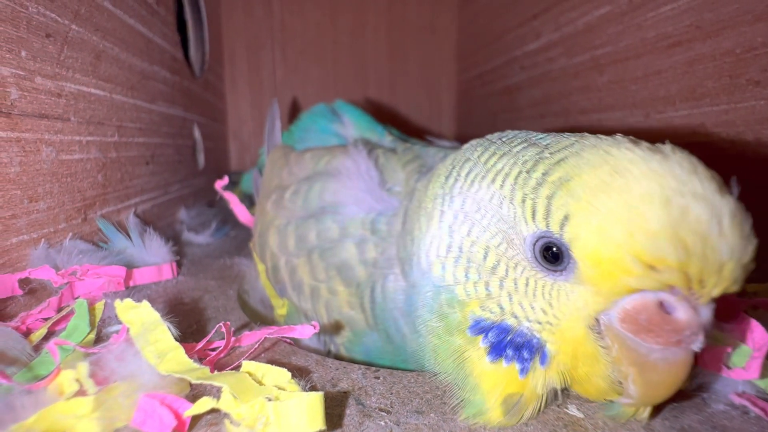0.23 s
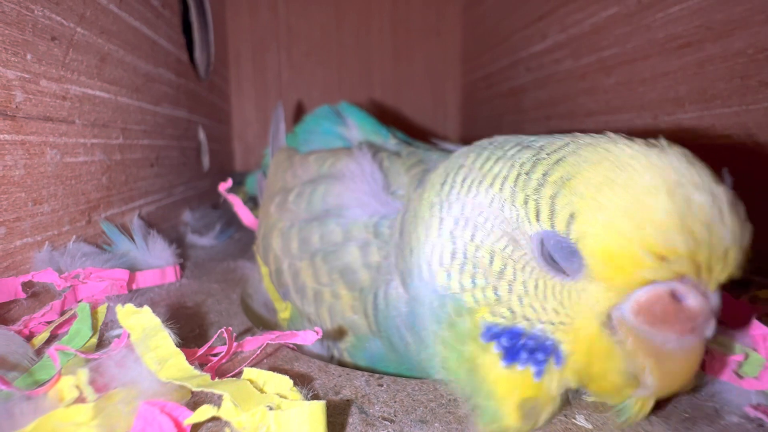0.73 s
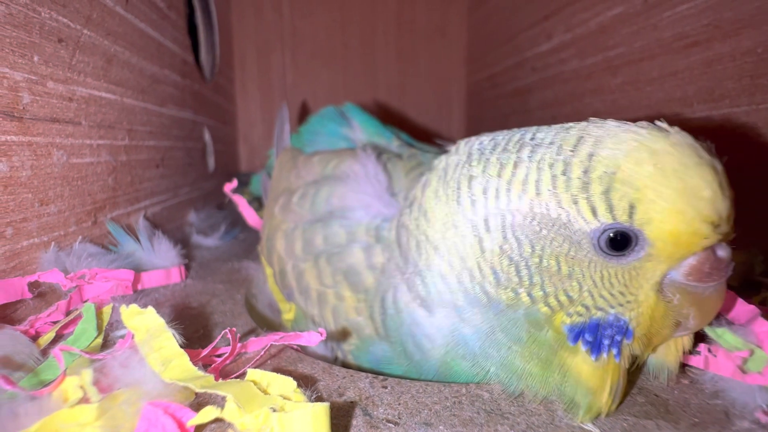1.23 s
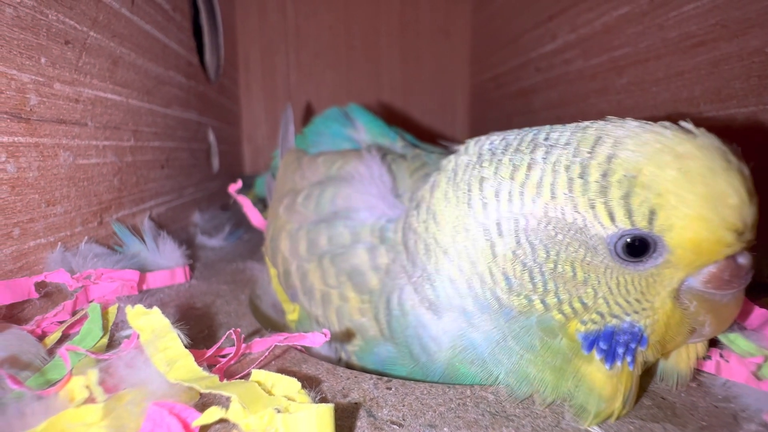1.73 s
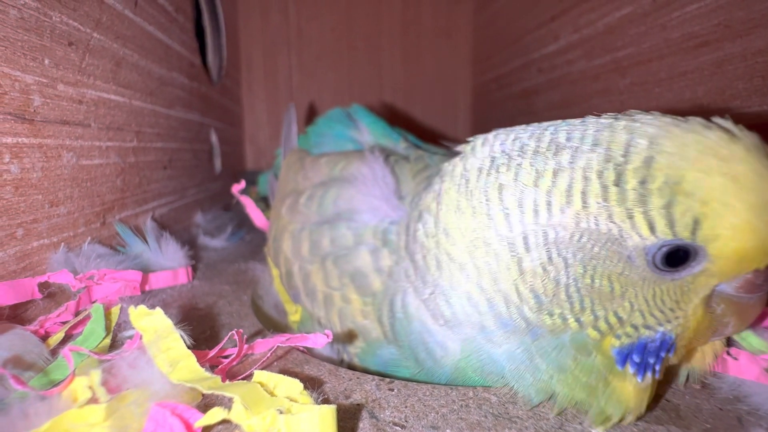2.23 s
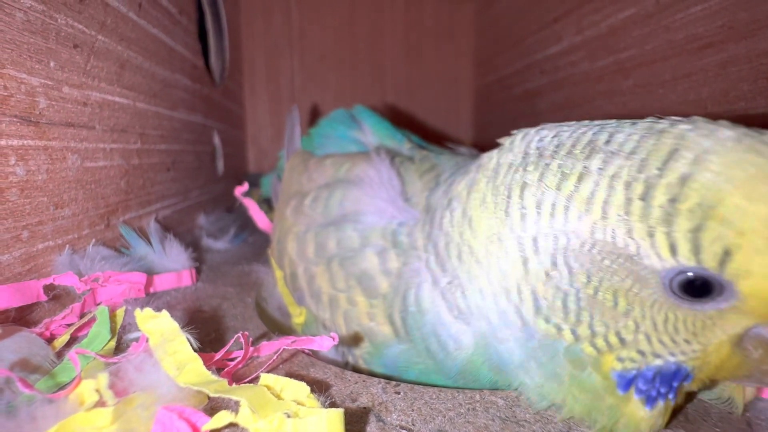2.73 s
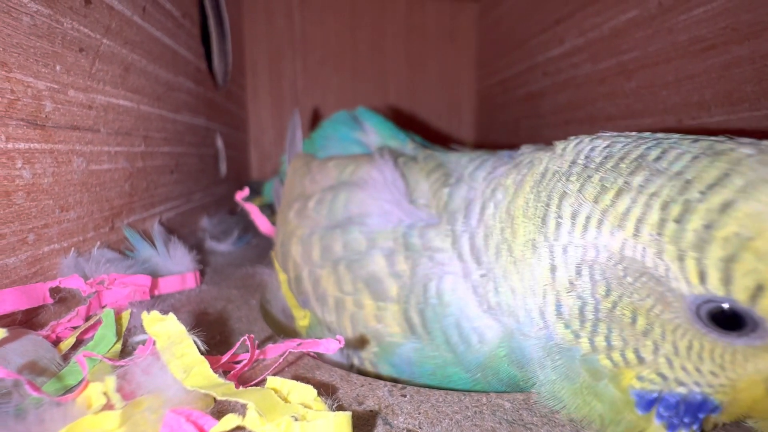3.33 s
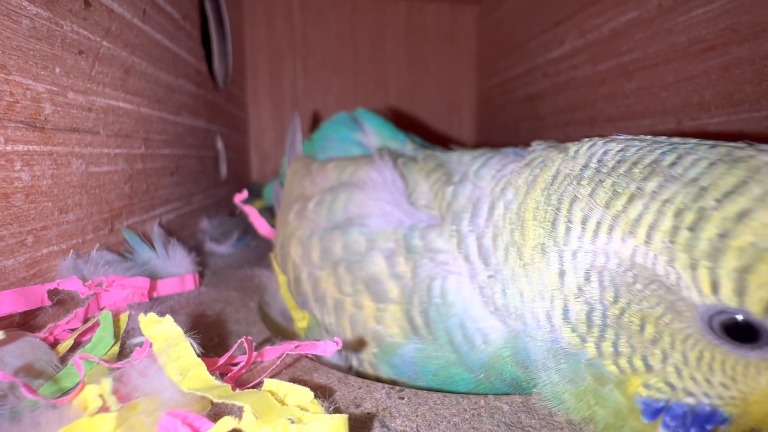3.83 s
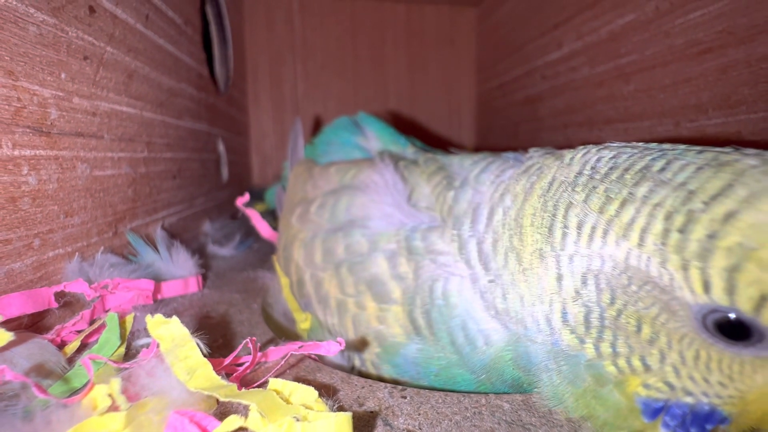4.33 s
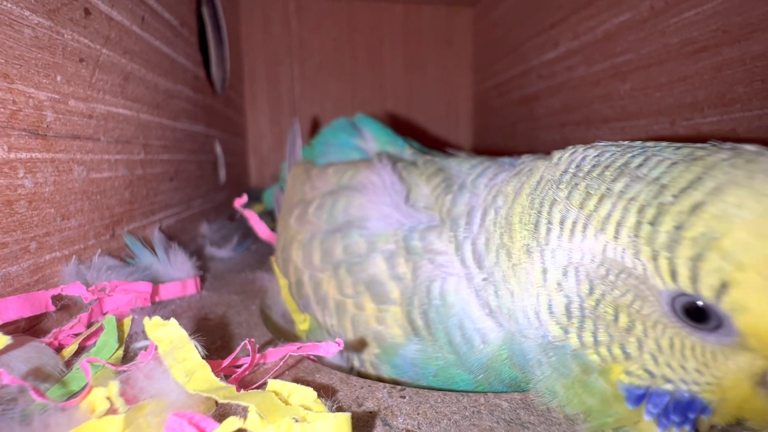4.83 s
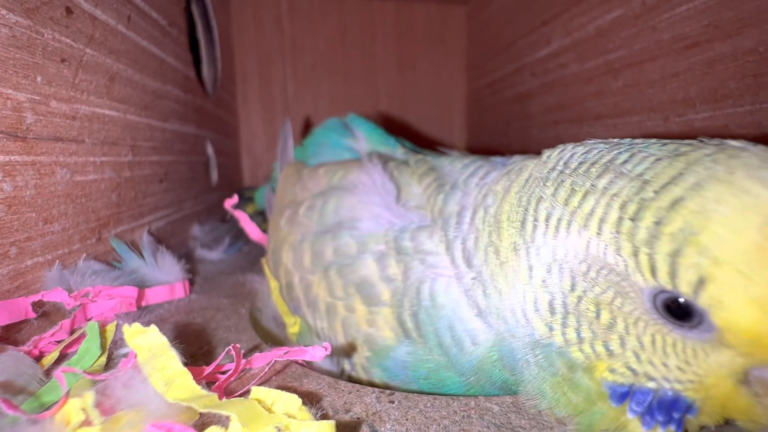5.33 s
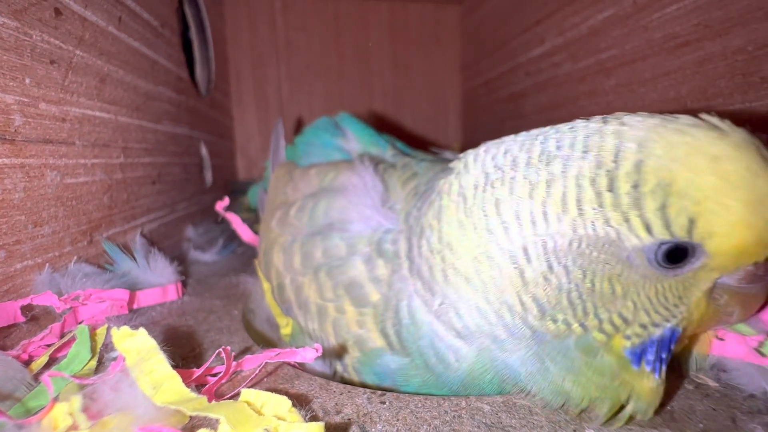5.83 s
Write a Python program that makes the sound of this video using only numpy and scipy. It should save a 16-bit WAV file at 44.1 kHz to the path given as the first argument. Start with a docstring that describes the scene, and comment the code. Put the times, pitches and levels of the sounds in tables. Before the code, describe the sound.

Close inside a plywood nest box, a small bird scuffs about in paper bedding and strikes the wood with one loud crack. After lighter taps come several separate hollow knocks, then pattering feet, a second hard thump and a run of crisp paper clicks and short scrapes. The microphones sit on the box floor, with a faint fan hum coming through the walls.

```python
"""A small parrot moves about in a plywood nest box, heard by two microphones on its floor.
From the start a fan hums faintly through the walls, feet scuff and paper strips rustle. Beak and claws
knock and scrape, hardest at 0.6 s: each knock bends the boards, so treble arrives first and bass late,
then the panels ring. Spaced wall knocks follow from 2 s, then a patter on the floor from 3.5 s.
Near 5 s come a brief soft swell of noise, another hard knock and a flurry of paper snaps and scrapes."""
import sys
import numpy as np
from scipy import signal
from scipy.fft import rfft, irfft, next_fast_len
from scipy.io import wavfile
from scipy.ndimage import uniform_filter1d

SR = 44100
rng = np.random.default_rng(int(sys.argv[2]) if len(sys.argv) > 2 else 0)


def wav_record(signal):
    """Record a signal, one row per channel, as 16-bit PCM in the file named by sys.argv[1]."""
    frames = np.transpose(np.atleast_2d(signal))
    bounded = np.clip(frames, -1, 1)
    # unit amplitude maps onto the largest positive 16-bit level
    quanta = np.round(bounded * 32767).astype(np.int16)
    wavfile.write(sys.argv[1], SR, quanta)


N = 268921


def undb(db):
    """Turn decibels into a gain."""
    return 10 ** (np.asarray(db) / 20)


def unit(x):
    """Scale to an average (rms) level of 1."""
    return x / np.sqrt(np.mean(x ** 2))


def at_peak(x, db):
    """Scale so the biggest sample reaches db."""
    return undb(db) * x / np.max(np.abs(x))


def shape(x, response):
    """Filter x by a response: a gain for each frequency."""
    size = next_fast_len(len(x))
    hz = np.arange(size // 2 + 1) * SR / size + 0.00094
    return irfft(rfft(x, size) * response(hz), size)[:len(x)]


def noise(response):
    """Filtered noise at level 1."""
    return unit(shape(rng.standard_normal(N), response))


def colour(points):
    """Response through (pitch_hz, level_db) points."""
    hz, db = np.transpose(points)
    return lambda f: undb(np.interp(np.log(f), np.log(hz), db))


def peak(hz, width, power=1):
    """Response of one resonance; power 2 makes it steeper."""
    return lambda f: (1j * f * width / (hz ** 2 - f ** 2 + 1j * f * width)) ** power


def ringing(modes, gains, ring_share=1):
    """Response of modes, the fading notes of a struck thing; a soft contact feeds little above them."""
    hz, db, ring_s = (c[:, None] for c in np.transpose(modes))
    width = np.log(1000) / (np.pi * ring_s * ring_share)
    soft = lambda f: 1 / (1 + (f / (1.12 * np.max(hz))) ** 12)
    return lambda f: soft(f) * np.sum(gains[:, None] * undb(db) * peak(hz, width)(f) / width, axis=0)


def near(modes, pitch_hz, spread):
    """Gains that favour the modes close to a pitch."""
    return .2 + np.exp(-np.log(np.transpose(modes)[0] / pitch_hz) ** 2 / spread)


def follow(table, s):
    """Read a table's columns at time s, gliding between rows."""
    times, *columns = np.transpose(table)
    return [np.interp(s, times, column) for column in columns]


def wander(rate):
    """Glide to a new random value, rate times a second."""
    step = int(SR / rate)
    return unit(uniform_filter1d(np.repeat(rng.standard_normal(N // step + 1), step), step)[:N])


def grains(rate, scatter_db):
    """Tiny random contacts, about rate a second."""
    hit = rng.random(N) < rate / SR
    return unit(hit * rng.standard_normal(N) * undb(scatter_db * rng.exponential(size=N)))


def add(out, s, mid, side, pan_db):
    """Mix in a sound at time s: mid is what both microphones share, side is how they differ."""
    start, sign = int(s * SR), np.array([[1], [-1]])
    fade = np.minimum(np.arange(len(mid), 0, -1) / (.1 * len(mid)), 1) ** 2
    stereo = undb(sign * pan_db / 2) * fade * (mid + sign * side)
    a, b = max(start, 0), min(start + len(mid), N)
    out[:, a:b] += stereo[:, a - start:b - start]


# Tone of the fan, mid and side: pitch_hz, level_db
FAN_MID_TONE = [(18, -36.5), (30, 9.5), (93, 9.5), (121, -20.5), (161, -10), (266, -5.5), (415, -40.5),
                (721, -13.5), (988, -30.5), (1460, -35.5), (1860, -30), (2540, -21.5), (2830, -52),
                (7870, -71.5), (16000, -57.5)]
FAN_SIDE_TONE = [(18, -31), (30, -4.5), (86, 16), (153, -13), (355, -42), (499, -2.5), (584, -4.5),
                 (1630, -37.5), (2610, -57.5), (3870, -46), (6050, -12), (7470, -18), (16000, -69.5)]
# Box resonances and the motor's hum: pitch_hz, width_hz, level_db
BOX_PEAKS = [(280, 16, -74), (878.5, 42, -78.5), (1902, 403, -70), (6000, 1100, -85.5), (7800, 1700, -86.5)]
MOTOR_HUM = (99.6, 7.8, -56.5)


def fan():
    """A rush of air, louder where the box resonates, and a wavering motor hum."""
    treble_swell_db = 1.5 * wander(2.5)
    mid = undb(-59) * noise(colour(FAN_MID_TONE))
    for hz, width, db in BOX_PEAKS:
        mid += undb(db + wander(7.6) + treble_swell_db * (hz > 4000)) * noise(peak(hz, width, 2))
    hz, width, db = MOTOR_HUM
    hum = undb(db) * noise(peak(hz, width, 2))
    side = undb(-65 + 0.7 * wander(1.8)) * noise(colour(FAN_SIDE_TONE))
    return np.array([mid + hum, side - 0.027 * hum])


# The box's modes in four groups, low to high: pitch_hz, level_db, ring_s (time to fade 60 dB)
THUD_MODES = [(65, -1, 0.22), (104.4, 3, 0.12), (166, 0, 0.1)]
PANEL_MODES = [(217, -3, 0.085), (254, 1.5, 0.085), (291, 2, 0.115), (355, -8, 0.13), (414, -2, 0.21)]
RING_MODES = [(500, 8, 0.098), (586, 16, 0.049), (729, 1.5, 0.066), (802.6, -1, 0.11), (873, -3, 0.12),
              (908, -9, 0.15), (1020, -29.5, 0.12), (1040, -9.5, 0.033)]
TAP_MODES = [(1333, 3.5, 0.042), (1520, -4, 0.067), (1681, 6, 0.029), (1802, 1, 0.039), (2090, 2, 0.027)]
BOX_MODES = THUD_MODES, PANEL_MODES, RING_MODES, TAP_MODES
# Pitches that scuffing favours: thud_hz, panel_hz, ring_hz, tap_hz
SCUFF_PITCHES = (62, 285, 930, 1600)
# Tone of the paper and of an airy hiss: pitch_hz, level_db
PAPER_TONE = [(710, -33), (1200, -2), (1370, 1.5), (2350, -6.5), (3320, -6), (10600, -21.5), (12300, -27),
              (14500, -25.5), (16000, -48)]
HISS_TONE = [(88, -68), (150, -3), (291, 1.5), (451, -7), (910, -9), (1190, -20), (2310, -24.5),
             (3500, -35), (7340, -41), (14000, -57)]
# Sliding feathers: pitch_hz, width_hz, level_db (against the hiss)
FEATHER_BAND = (7780, 1500, -25.5)
# The bird shifting about: time_s, weight_db, scuff_db, paper_db, hiss_db
MOVES = [(0.0, -50.5, -49, -69, -53), (0.12, -36.5, -42.5, -71, -49.5), (0.349, -41, -47.5, -75, -51.5),
         (0.52, -34, -50.5, -71.5, -51.5), (0.68, -44.5, -63, -75, -52), (0.85, -62, -52, -74, -55.5),
         (1.17, -66, -67, -71.5, -62.5), (1.3, -63, -81, -75, -68), (1.51, -100, -61, -84, -75),
         (1.649, -64, -45.5, -105, -82), (1.78, -74, -64.5, -101, -64.5), (1.92, -86, -69, -76, -62.5),
         (2.399, -92.5, -66.5, -88.5, -64), (2.951, -88, -68, -82.5, -72.5), (3.2, -62, -70.5, -82.5, -56),
         (3.57, -58, -74, -79.5, -53.5), (3.72, -59, -58, -86.5, -58.5), (4.0, -55, -54.5, -74.5, -48.5),
         (4.179, -89, -54.5, -85, -61), (4.35, -81, -69.5, -79, -73), (4.801, -59, -96, -91, -65.5),
         (5.1, -61.5, -67, -77.5, -51), (5.25, -52.5, -66, -73.5, -49.5), (5.38, -52.5, -65, -73, -51),
         (5.57, -74, -72, -76, -53.5), (5.76, -61, -100, -80.5, -67), (6.1, -62.5, -96, -84, -70)]


def shuffle():
    """Feet and belly scuff the floor and set the box ringing; paper rustles and feathers slide."""
    t = np.arange(N) / SR
    weight, scuff, paper, hiss = undb(follow(MOVES, t))
    settling = rattle(t)
    scuff, paper = scuff + settling, paper + undb(-34.5) * settling
    mid, side = 0, hiss * noise(colour(HISS_TONE))
    mid_grains, side_grains = grains(600, 1.7), grains(550, 0.64)
    gains = weight, scuff, undb(-12) * scuff, undb(-21) * scuff
    sides_db, spreads = (-3.5, -11.5, -2.5, -33), (0.36, 0.022, 0.012, 0.1)
    for modes, gain, side_db, hz, spread in zip(BOX_MODES, gains, sides_db, SCUFF_PITCHES, spreads):
        wood = ringing(modes, near(modes, hz, spread))
        mid += gain * unit(shape(mid_grains, wood))
        side += undb(side_db) * gain * unit(shape(side_grains, wood))
    rustle = [paper * unit(shape(grains(4800, 0.72), colour(PAPER_TONE))) for _ in range(2)]
    hz, width, db = FEATHER_BAND
    feathers = undb(db) * hiss * noise(peak(hz, width, 2))
    return np.array([mid + feathers + rustle[0], side + undb(-3.5) * rustle[1]])


EVENT_SAMPLES, LEAD_SAMPLES = 8192, 512  # room for one knock or snap; room before a blow lands
BEND_SPREAD = 0.151  # bigger makes the bass trail further behind the treble
# Where the bird strikes sets the favoured pitches, the ring time and the path through the wood:
# time_s, panel_hz, panel_spread, top_panel_db, ring_hz, low_ring_db, tap_hz, ring_share, path_ratio
STRIKE_SPOTS = [(0.078, 280, 0.056, -4, 912, -15, 1500, 0.45, 1),
                (0.49, 280, .048, -4, 610, 1, 1750, 0.93, 1.01),
                (0.641, 269, 0.012, -1.5, 780, 3, 1500, 0.48, 0.85),
                (1.0, 288, .03, 4, 870, -10, 1800, 0.23, 0.89),
                (1.55, 280, 0.023, -2, 905, -12, 1750, 0.99, 1.19),
                (2.167, 295, 0.021, 0.5, 770, 1.5, 1750, 0.5, 0.83),
                (2.541, 301, 0.035, 0.5, 776, 2, 1750, 0.64, 0.7),
                (2.756, 303, 0.054, 0.5, 790, -2, 1750, 0.61, 0.9),
                (3.121, 300, 0.043, 7, 756, -0.5, 1400, 0.58, 0.83),
                (3.332, 289, 0.057, 7.5, 770, -2, 1400, 0.57, 0.93),
                (3.45, 277, 0.028, 0, 914, -2, 1750, 0.49, 1.08),
                (3.72, 272, 0.044, -7, 880, 1, 1750, 0.6, 1.1),
                (3.867, 260, .048, 5, 916, -2, 1750, 0.56, 0.85),
                (4.534, 304, 0.016, -9, 815, 5.5, 1750, 0.61, 1.02),
                (4.953, 272, 0.07, 2, 878, -2.5, 1700, 0.47, 0.73),
                (5.383, 240, 0.027, -13, 820, -8.5, 1750, 0.59, 0.82),
                (5.93, 235, 0.027, -7, 720, -12, 1600, 0.66, 0.935)]
# Favoured pitch of the thud: time_s, pitch_hz
THUD_PITCHES = [(0.641, 101), (2.563, 85), (3.45, 110), (4.089, 110), (4.953, 139), (5.816, 109)]
# Side against mid for a blow on the floor: thud_db, panel_db, ring_db, tap_db
FLOOR_SIDE_DB = (-2, -0.5, 3.5, -8.5)
# Floor modes that tip the microphones against each other: pitch_hz, level_db, ring_s
ROCKING_MODES = [(535.4, -1.5, 0.13), (1040, -7, 0.019)]


def boards(s, levels_db):
    """A blow sends bending waves through the wood, treble fastest, and the box rings."""
    t = (np.arange(EVENT_SAMPLES) - LEAD_SAMPLES) / SR
    claw_drag = (t > 0) * (np.exp(-t / .003) + 0.29 * np.exp(-t / 0.013))
    blow = (t == 0) + .03 * claw_drag * rng.standard_normal(len(t))
    panel_hz, panel_spread, top_db, ring_hz, low_db, tap_hz, ring_share, path = follow(STRIKE_SPOTS, s)
    # Wave speed grows with the square root of pitch; 2 kHz arrives on time.
    bend = lambda f: np.exp(-2j * np.pi * path * BEND_SPREAD * (2 * np.sqrt(f) - f / np.sqrt(2000)))
    strike = lambda modes, gains: shape(blow, lambda f: bend(f) * ringing(modes, gains, ring_share)(f))
    pitches = follow(THUD_PITCHES, s)[0], panel_hz, ring_hz, tap_hz
    spreads = 0.071, panel_spread, 0.004, .05
    mid, side = 0, 0
    for modes, db, side_db, hz, spread in zip(BOX_MODES, levels_db, FLOOR_SIDE_DB, pitches, spreads):
        scatter, flip = rng.standard_normal((2, len(modes)))
        gains = near(modes, hz, spread)
        if modes is PANEL_MODES:
            gains[-1] *= undb(top_db)
        if modes is RING_MODES:
            gains[:2] *= undb(low_db)
        mid += at_peak(strike(modes, gains * undb(1.5 * scatter)), db)
        # The microphones sit on different spots of each mode.
        side += at_peak(strike(modes, gains * 1j * np.sign(flip)), db + side_db)
    thud_db, panel_db, _, tap_db = levels_db
    side += at_peak(strike(ROCKING_MODES, np.ones(len(ROCKING_MODES))), thud_db + 0.5)
    # Floor blows thud and tap; wall blows reach both microphones more alike.
    on_floor = 1 / (1 + undb(panel_db + 1) / (undb(thud_db) + undb(tap_db - 15)))
    return mid, (on_floor + (1 - on_floor) * undb(-20.5)) * side


HARDEST_CRACK_DB = -27.5
# Noise bands of the hardest crack: pitch_hz, width_hz, level_db, loss_db (per dB softer)
CRACK_BANDS = [(3730, 5300, 3, 1), (2510, 320, 5, 1), (4110, 300, -2, 1.7), (5090, 460, 3, 1.4),
               (6000, 820, -3, 0), (9100, 9800, -18, 4)]
# Short rings of a hard blow: pitch_hz, level_db, ring_s
BEAK_MODES = [(2090, -5, .025), (2420, -3, .025), (2740, -8, .02), (3500, -12, .02), (4190, -6, .022),
              (5050, 2, .024), (6440, -9, .022), (8140, -20, .015)]


def crack(db):
    """A blow's crack comes through the air just ahead of the ring; softer ones are duller."""
    samples = np.arange(EVENT_SAMPLES) - LEAD_SAMPLES
    t = samples / SR + 0.00062
    burst = (t > 0) * np.exp(-t / 0.0041)
    tail = (t > 0) * undb(-19) * np.exp(-t / 0.021)
    softer_db = HARDEST_CRACK_DB - db
    top_hz = 19900 / 2 ** (softer_db / 25)
    bands = lambda f: sum(undb(level - loss * softer_db) * peak(hz, width, 2)(f)
                          for hz, width, level, loss in CRACK_BANDS)

    def burst_and_hiss():
        sharp = shape(burst * rng.standard_normal(len(t)), bands)
        hiss = shape(tail * rng.standard_normal(len(t)), peak(5000, 5000, 2))
        return shape(sharp + hiss, lambda f: 1 / (2 + (f / top_hz) ** 4))

    mid, side = burst_and_hiss(), burst_and_hiss()
    gain = undb(db) / np.max(np.abs(mid))
    beak = shape(1. * (samples == 0), ringing(BEAK_MODES, (-1.) ** np.arange(len(BEAK_MODES))))
    return gain * mid + at_peak(beak, db - 2 - .6 * softer_db), undb(-2) * gain * side


# Beak and claw blows: start_s, thud_db, panel_db, ring_db, tap_db, crack_db, pan_db (left minus right)
BLOWS = [(0.025, -32.5, -42, -42.5, -38, -54, 3.5), (0.078, -68, -60, -32, -37, -77, -5.5),
         (0.0825, -39, -49, -28.5, -53, -81, -9.5), (0.488, -40, -62, -39.5, -43.5, -71, -0.5),
         (0.606, -30.5, -33.5, -37, -63, -62, -8), (0.6408, -33, -4.5, -15.5, -26, -27.5, 0),
         (0.754, -70, -35.5, -52, -72, -80, 1), (0.82, -70, -36, -46, -72, -75, -4),
         (0.867, -66, -38, -54, -70, -67, 1), (0.967, -70, -43, -48, -37.5, -52.5, 1),
         (0.983, -72, -35, -44, -68, -85, -1), (0.994, -72, -35.5, -51, -72, -80, 0),
         (1.006, -72, -37, -43, -41.5, -75, -1), (1.027, -72, -43, -60, -72, -78, -1),
         (1.121, -72, -39.5, -58, -72, -82, -1), (1.166, -74, -40, -54, -72, -59, -3),
         (1.545, -85, -37.5, -42.5, -57, -63, -1), (1.638, -75, -42, -41, -73, -85, -2),
         (2.095, -79, -41.5, -55, -52.5, -87.5, 0.5), (2.167, -82, -12, -27, -46, -46.5, -2),
         (2.391, -51, -71, -83, -74, -85, 0), (2.504, -57, -36, -86, -51, -69, 2),
         (2.542, -70, -12, -26.5, -46, -48.5, 0.5), (2.562, -32.5, -47, -36.5, -54, -54, -1),
         (2.755, -36.5, -25, -53, -62, -66, 1.5), (3.121, -54, -14, -23, -43, -59.5, -0.5),
         (3.274, -42, -46, -45.5, -60, -64.5, 1.5), (3.331, -59.5, -15, -27, -69.5, -85.5, -0.5),
         (3.451, -24, -28, -26.5, -30, -57, 0.5), (3.457, -35, -26, -36, -57, -80, -1),
         (3.53, -27, -36.5, -33.5, -46, -58, -3), (3.719, -29, -36.5, -46.5, -83, -66, -2),
         (3.768, -33.5, -56, -58, -58, -80, 0.5), (3.834, -30.5, -31.5, -47.5, -55, -64, 5.5),
         (3.867, -76, -26.5, -33, -44.5, -89, 0), (3.894, -33.5, -79, -53, -65, -66, 4.5),
         (3.929, -36, -37, -41, -45.5, -65, 3), (3.97, -38, -62, -43, -42.5, -69, 3),
         (4.025, -31.5, -67, -70, -44, -79, 2.5), (4.056, -33.5, -42, -40, -37.5, -60, 1.5),
         (4.089, -33.5, -39.5, -57, -46, -66, 6), (4.137, -74, -43, -47.5, -71, -86, -4),
         (4.533, -66, -18, -35, -42, -42.5, -1.5), (4.953, -17.5, -10, -16, -19.5, -45, 1),
         (5.383, -72, -37, -42.5, -44, -49, 3.5), (5.404, -70, -56, -49, -49, -75, -3),
         (5.415, -68, -43.5, -56, -58, -75, -4), (5.449, -58, -52, -62, -58, -75, 3),
         (5.484, -53, -44, -46, -54, -75, -2), (5.497, -49, -46.5, -43, -42, -62, -2),
         (5.517, -58, -52, -58, -62, -75, -2), (5.546, -60, -51, -49, -49, -75, 0),
         (5.586, -55, -58, -53, -54, -75, 4), (5.626, -55.5, -72, -67, -53, -75, -1),
         (5.71, -49.5, -46, -42.5, -48.5, -50.5, 4.5), (5.816, -42, -45, -45, -83, -63, 0.5),
         (5.933, -46, -47.5, -50.5, -75, -53.5, -2)]


def knocks():
    """Each blow of beak or claw rings the boards and cracks."""
    out = np.zeros((2, N))
    for s, *levels_db, crack_db, pan_db in BLOWS:
        wood_mid, wood_side = boards(s, levels_db)
        crack_mid, crack_side = crack(crack_db)
        add(out, s - LEAD_SAMPLES / SR, wood_mid + crack_mid, wood_side + crack_side, pan_db)
    return out


def rattle(t, settle_s=0.069):
    """How strongly loose boards and bedding stir as they settle after each blow."""
    level = sum(undb(0.74 * panel_db - 35) * (t > s) * np.exp(-np.abs(t - s) / settle_s)
                for s, _, panel_db, *_ in BLOWS)
    return uniform_filter1d(level, size=441, origin=220)  # builds up over 10 ms


# Resonance of a dragged paper edge: pitch_hz, width_hz, level_db
PAPER_EDGE = (6600, 900, 4.4)
# Swells of gritty noise: start_s, length_s, level_db, brightness_hz, rise_share (of the length)
# The row at 4.922 s is a brief soft swell of noise just before the hard knock; the rest are scrapes.
SWELLS = [(0.069, 0.056, -46.5, 1540, 0.23), (0.462, 0.068, -53.5, 890, 0.34),
          (0.599, 0.038, -50.5, 885, 0.041), (1.048, 0.093, -59, 6000, 0.27),
          (1.541, 0.042, -53.5, 3340, 0.059), (1.575, 0.07, -62, 2600, .2),
          (1.634, 0.044, -57.5, 1160, 0.099), (3.261, 0.11, -63.5, 886, .05),
          (3.512, 0.059, -59.5, 2290, 0.13), (4.922, 0.04, -45.5, 1620, 0.58),
          (5.365, 0.061, -66, 15000, 0.057), (5.375, 0.052, -58.5, 6000, .1), (5.445, 0.018, -62, 6000, .1),
          (5.462, 0.085, -59.5, 6300, 0.16), (5.467, 0.075, -65.5, 15000, 0.45),
          (5.541, 0.012, -58.5, 6000, 0.1), (5.588, 0.016, -60, 2960, 0.14),
          (5.698, 0.049, -61.5, 5000, 0.079), (5.795, 0.051, -58, 2740, 0.18)]


def gritty_swells():
    """Gritty noise swells and dies away; most swells are beak or feathers slipping on wood and paper."""
    out = np.zeros((2, N))
    edge_hz, edge_width, edge_db = PAPER_EDGE
    for s, length, db, bright_hz, rise in SWELLS:
        progress = np.arange(int(2 * length * SR)) / (length * SR)
        swell = np.minimum(progress / rise, 1) * np.exp(-(progress / 0.99) ** 3)
        grit = undb(2.3 * rng.exponential(size=(2, 20480))) * rng.standard_normal((2, 20480))

        def tone(f):
            body = (f / 500) ** 2 / (1 + (f / 500) ** 2.68)
            dulling = (1 + (f / bright_hz) ** 2) * (1 + (f / (3.2 * bright_hz)) ** 8)
            edge = 1 + undb(edge_db) * np.abs(peak(edge_hz, edge_width)(f)) ** 2
            return body / dulling * edge

        mid, side = (undb(db) * swell * unit(shape(g[:len(progress)], tone)) for g in grit)
        add(out, s, mid, undb(-12) * side, pan_db=0)
    return out


# Snaps of the paper strips: start_s, level_db, pitch_hz
PAPER_SNAPS = [(1.005, -44, 2480), (3.45, -45, 2500), (4.532, -48, 8000), (5.095, -44.5, 6000),
               (5.242, -68, 7500), (5.3194, -61, 7700), (5.364, -49, 2480), (5.381, -43, 6000),
               (5.404, -39.5, 2470), (5.409, -40, 2590), (5.448, -50, 2700), (5.473, -59, 7800),
               (5.483, -52, 8050), (5.492, -46, 9000), (5.4955, -38.5, 2620), (5.519, -50, 6460),
               (5.548, -51, 2570), (5.6245, -59, 2560), (5.7146, -40, 4600), (5.82, -50, 2540)]


def snaps():
    """A fold of paper lets go: a millisecond of noise, then a grainy crinkle."""
    out, t = np.zeros((2, N)), np.arange(EVENT_SAMPLES) / SR
    for s, db, hz in PAPER_SNAPS:
        crinkle = undb(0.67 * rng.exponential(size=len(t))) * (rng.random(len(t)) < .2)
        burst = np.exp(-t / 0.00032) + undb(-16) * crinkle * np.exp(-t / .009)
        mid, side = (shape(burst * rng.standard_normal(len(t)), peak(hz, 1.7 * hz)) for _ in range(2))
        gain = undb(db) / np.max(np.abs(mid))
        add(out, s, gain * mid, gain * side, pan_db=2.2 * rng.standard_normal())
    return out


def scene():
    """Turn the ongoing sounds from mid and side into left and right, then add the short ones."""
    mid, side = shuffle() + fan()
    return np.array([mid + side, mid - side]) + knocks() + gritty_swells() + snaps()


def record(dry):
    """The microphones lose the deep bass; the recorder cuts the highest treble."""
    bass_cut = signal.sosfilt(signal.butter(6, 49, "high", fs=SR, output="sos"), dry)
    return signal.sosfilt(signal.ellip(8, .2, 70, 16000, fs=SR, output="sos"), bass_cut)


dry = scene()
out = record(dry)
wav_record(out)
```